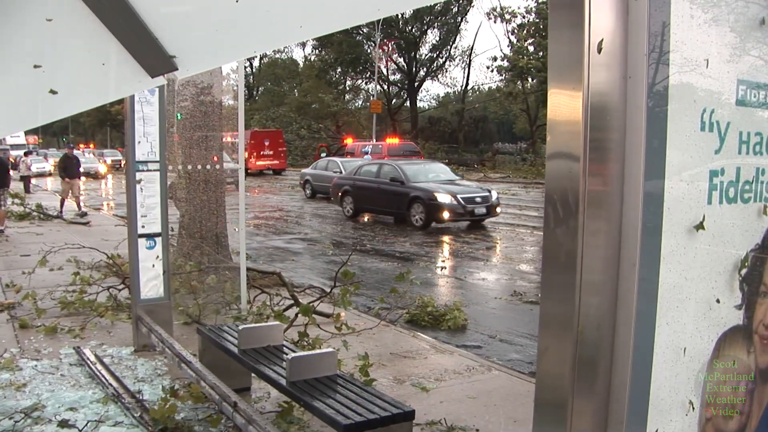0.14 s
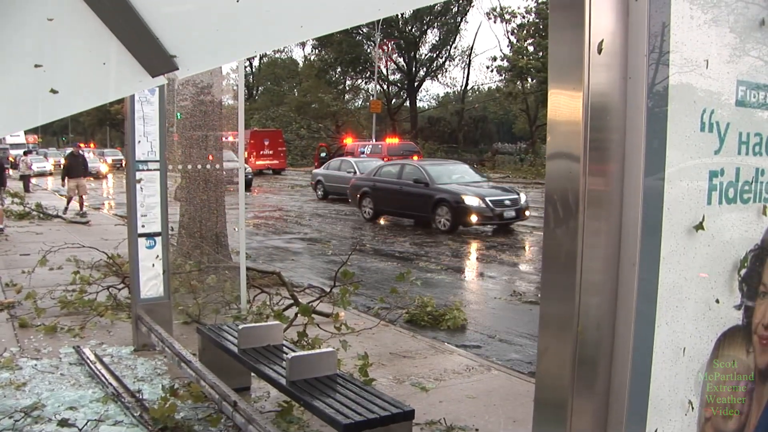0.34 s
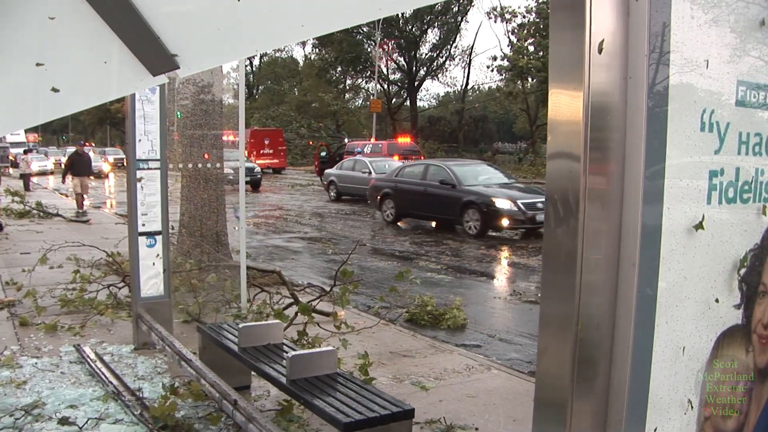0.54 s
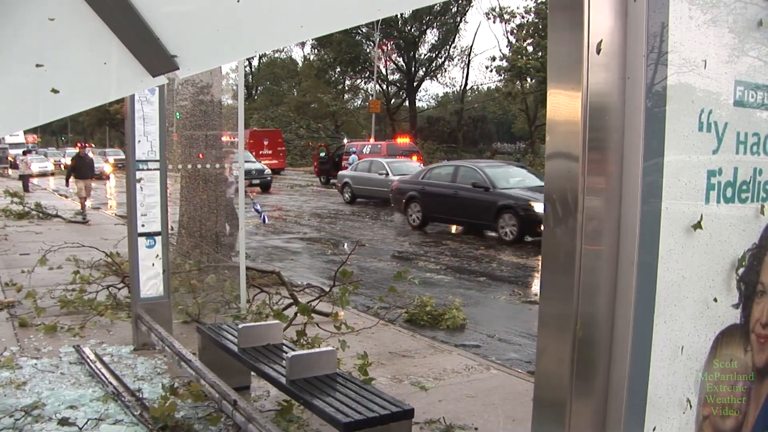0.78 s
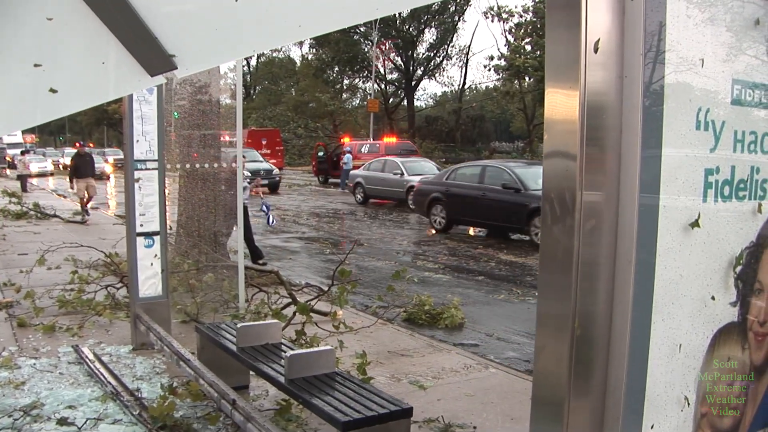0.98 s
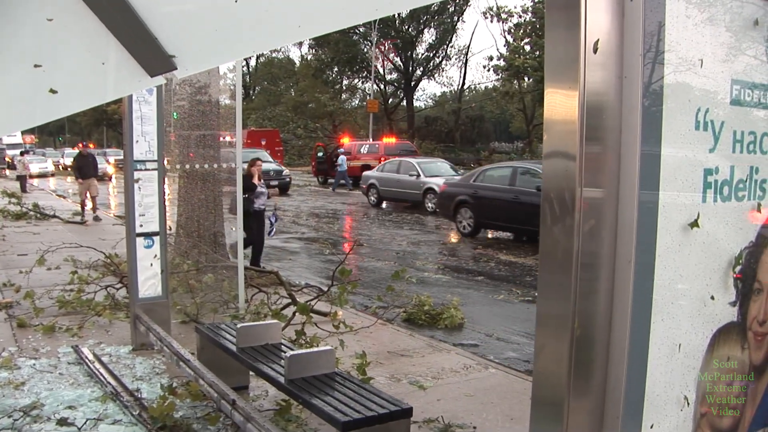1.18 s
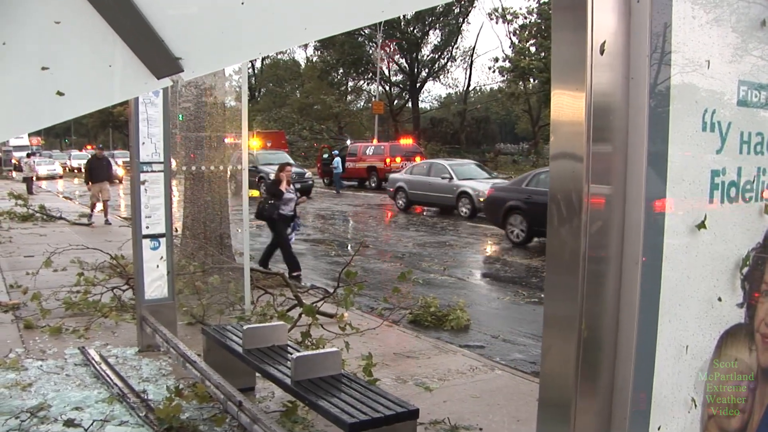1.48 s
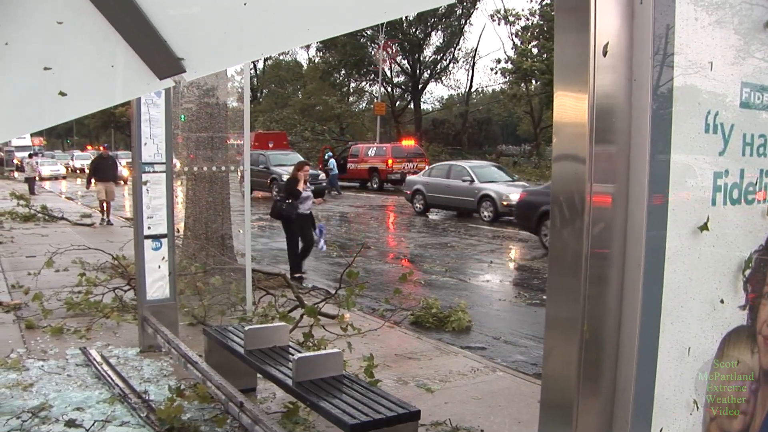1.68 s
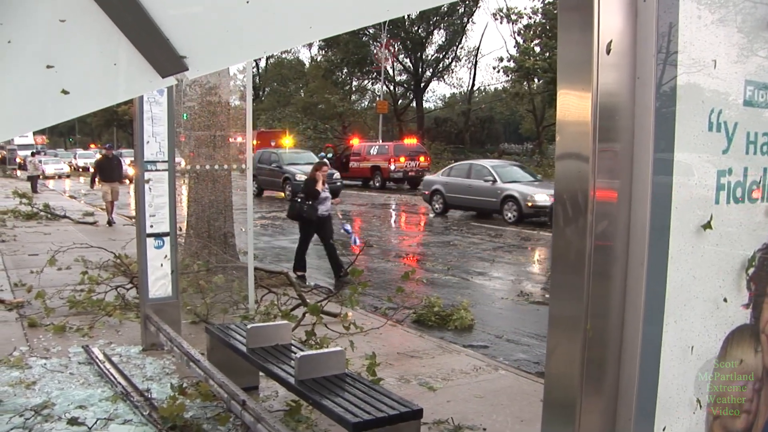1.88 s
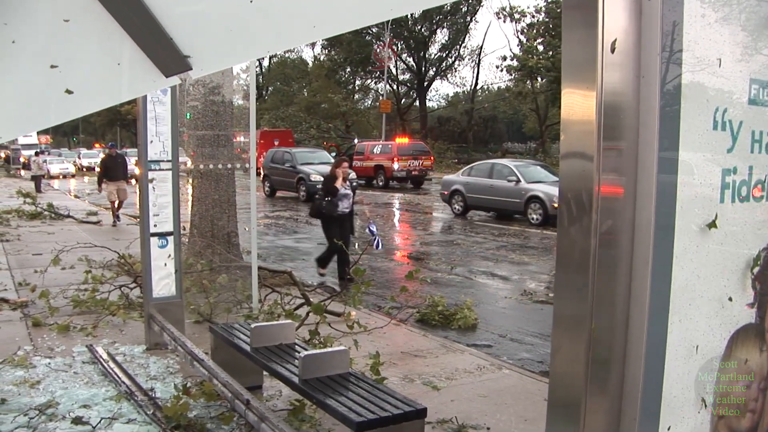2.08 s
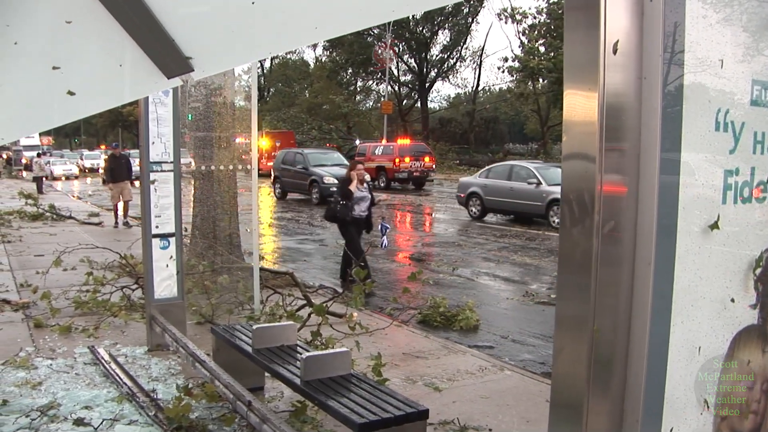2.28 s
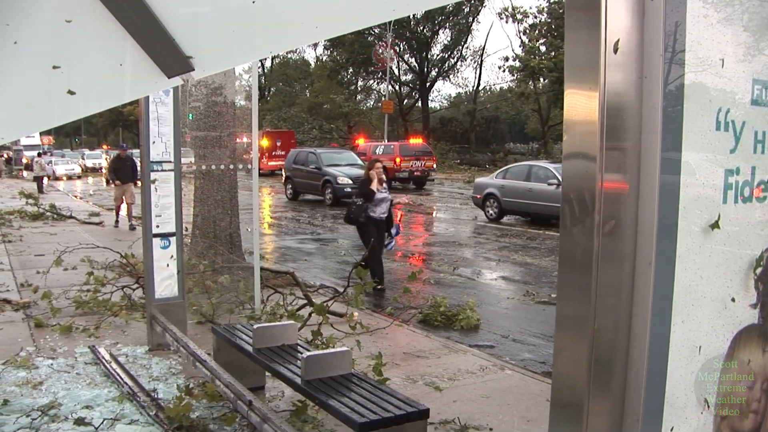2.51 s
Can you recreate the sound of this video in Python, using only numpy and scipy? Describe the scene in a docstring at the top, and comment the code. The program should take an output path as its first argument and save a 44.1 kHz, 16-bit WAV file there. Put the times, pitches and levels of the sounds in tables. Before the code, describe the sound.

Car tyres hiss and spatter on rain-soaked pavement as engines drone by and gradually fade

```python
"""Slow traffic on a wet street

A rain-soaked city street in stereo, from far to near. Far off lie low rumble, knocks and tyre noise, all
coloured noise or damped tones. Engines drone as sums of sines on a firing rate; one picks up at the end.
Faint whines are wavering sines and a brake squeals thin and high as a juddering one. Closest, the passing
car fades: its tyre hiss is flickering noise, its spray thousands of random clicks, with splashes on top.
"""
import sys
import numpy as np
from scipy import signal
from scipy.fft import rfft, irfft
from scipy.io import wavfile

SR = 44100
rng = np.random.default_rng(int(sys.argv[2]) if len(sys.argv) > 2 else 0)


def output_pcm(signal):
    """Save a mono or channel-first signal as 16-bit PCM at the path in sys.argv[1].

    Samples are clipped to [-1, 1] before scaling.
    """
    pcm = np.clip(np.atleast_2d(signal).T, -1, 1) * 32767
    wavfile.write(sys.argv[1], SR, np.round(pcm).astype(np.int16))


N = 116865
T = np.arange(N) / SR
HZ = np.maximum(np.fft.rfftfreq(N, 1 / SR), 1)

# Colours below are relative (dB per Hz): every noise is brought to rms 1 before its level is set.
# Stereo width of the noises: columns f/Hz, left-right likeness (-1 to 1)
STEREO_LIKENESS = [(60, .998), (110, .99), (200, .97), (340, .8), (500, .5), (680, .15), (1100, .23),
                   (1800, .6), (3100, .94), (3700, .68), (4450, -.45), (5000, .5), (5450, -.66),
                   (5900, -.72), (6250, -.9), (7000, -.93), (7700, -.85), (8400, -.5), (9250, -.55),
                   (10300, .74), (11600, .55), (12500, .12), (13700, .15), (14300, .58), (15000, .2)]
# Stereo balance of the noises: columns f/Hz, left over right/dB
STEREO_BALANCE = [(100, .1), (300, .6), (700, -2.2), (1500, -3.3), (2500, -.9), (4000, -.4), (5700, -2.7),
                  (6500, -.3), (7700, 0), (9050, -3.8), (9700, -.8), (11500, -4.5), (13500, -5.3),
                  (14500, -2.8)]
# Stereo phase of the noises: columns f/Hz, phase by which the left leads/rad
STEREO_LEAD = [(60, 0), (200, -.08), (450, -.4), (850, 0), (3100, -.02), (3900, -.45), (4400, 0),
               (4900, -.45), (5400, 0), (8300, 0), (9200, -.6), (9650, 0), (10000, .55), (10700, 0),
               (12000, -.4), (13000, 0)]
CUTOFF_HZ = 15080

# Rumble of the whole street, colour: columns f/Hz, density/dB
RUMBLE_COLOUR = [(20, -14), (38, -4.5), (58, 0.5), (100, -0.5), (135, -1), (200, -0.5), (260, -6.5),
                 (340, -12), (450, -19), (800, -77)]
# Rumble over time: columns t/s, level/dB
RUMBLE_LEVEL = [(0, -34.5), (.4, -34.5), (1.1, -34), (1.5, -34.5), (2.1, -33.5), (2.65, -36)]
# Passing swell in the low mids, colour: columns f/Hz, density/dB
SWELL_COLOUR = [(180, -15), (250, 1), (320, 16.5), (390, 3), (480, -29)]
# Swell over time: columns t/s, level/dB
SWELL_LEVEL = [(0, -68), (.7, -61), (1.0, -50), (1.45, -44.5), (1.9, -49.5), (2.65, -47)]
# Low knocks: columns t/s, envelope peak/dB
KNOCKS = [(1.874, -38), (2.006, -27), (2.054, -33), (2.477, -23)]
KNOCK_HZ, KNOCK_RISE_S = 123, 0.0049
# Far tyres, colour: columns f/Hz, density/dB
FAR_COLOUR = [(200, -8.5), (400, -0.5), (650, -0.5), (850, 1), (1100, 0.5), (1600, 0.5), (2500, -0.5),
              (3200, -6), (4300, -8), (6000, -28.5), (7300, -27.5), (9000, -29.5), (15000, -21.5)]
FAR_DB = -36.5
# Faint whines and drones of other vehicles: columns centre t/s, half length/s, f/Hz, waver/Hz, peak/dB
WHINE_TONES = [(2.23, .11, 1236, 6, -44), (1.33, .15, 1236, 7, -49), (.55, .2, 1236, 6, -51),
               (.5, .3, 2455, 25, -49), (.9, 1.0, 2072, 40, -53), (1.42, .07, 359, 5, -40),
               (1.62, .05, 381, 6, -47), (1.6, .5, 312, 3, -48), (.76, .07, 203, 3, -37),
               (.96, .09, 181, 2, -34), (1.62, .07, 224, 3, -40), (2.22, .11, 785, 14, -48)]

# Main engine slowing down: columns t/s, firing rate f/Hz, level/dB
MAIN_ENGINE = [(0, 92.4, -30), (.38, 92.2, -28), (.72, 92.8, -30), (.95, 90.4, -32.5), (1.25, 91, -32.5),
               (1.6, 88.1, -35.5), (1.88, 88.15, -34.5), (2.12, 84.53, -38), (2.65, 83.5, -40.5)]
# Its partials: columns multiple of the firing rate, relative level/dB
MAIN_ORDERS = [(1, 0), (1.501, -23), (2, -8.5), (2.25, -22)]
# Second engine easing off: columns t/s, firing rate f/Hz, level/dB
COASTING_ENGINE = [(0, 150.8, -47), (.35, 150.2, -33), (.65, 148, -45), (.85, 142, -39), (1.1, 137.7, -39),
                   (1.5, 130, -44), (2.05, 128.3, -35.5), (2.3, 120.7, -41.5), (2.65, 113.4, -42.5)]
# Its partials: columns multiple of the firing rate, relative level/dB
COASTING_ORDERS = [(1, 0.5), (1.5, -11), (2.75, -23)]
# Engine picking up: columns t/s, firing rate f/Hz, level/dB
PULLING_ENGINE = [(2.0, 128, -58), (2.23, 136, -45), (2.34, 156, -44), (2.45, 165, -31.5),
                  (2.56, 166, -30.5), (2.65, 168, -31.5)]
# Its partials: columns multiple of the firing rate, relative level/dB
PULLING_ORDERS = [(1, -1), (1.5, -19), (2, -20)]
ENGINE_LAG_S = .00007  # later on the left
ENGINE_ECHO_DB, ECHO_DECAY_S = -29, .05

# Brake squeal: columns t/s, level/dB
SQUEAL_LEVEL = [(.232, -62), (.245, -53), (.29, -53), (.355, -46), (.38, -55), (.4, -39.5), (.46, -43.5),
                (.48, -50), (.572, -51), (.6, -70)]
SQUEAL_HZ, SQUEAL_WAVER_HZ = 12795, 24
JUDDER_HZ, JUDDER_DEPTH = 56, 0.48
# Pitched rubbing of treads and brakes: columns centre t/s, half length/s, f/Hz, width/octaves, level/dB
RUBBING_BANDS = [(0.434, .13, 5770, .04, -58), (1.245, 0.13, 2090, 0.063, -41.5),
                 (1.249, 0.37, 1540, 0.091, -51.5), (1.382, .05, 3610, .008, -49),
                 (1.47, 0.14, 3170, 0.01, -48), (2.28, 0.13, 2450, .025, -44),
                 (2.3, 0.19, 2850, 0.056, -47), (2.25, .08, 1700, 0.022, -47)]
# White noise that the rubbing is cut from: columns f/Hz, density/dB
WHITE_COLOUR = [(100, 0), (15000, 0)]

# Single splashes: columns t/s, level/dB, left over right/dB, centre f/Hz, width/octaves
SPLASH_EVENTS = [(.166, -39, 0, 13000, .5), (.338, -35, 0, 11000, .35), (.787, -29, -1, 14500, .25),
                 (.83, -39, 0, 13000, .5), (.929, -33, 0, 13000, .8), (1.199, -42, 0, 12500, .5),
                 (1.507, -38, -1, 11500, .2), (1.683, -41, 0, 10300, .25), (2.265, -34.5, 5, 11000, .7)]
# Noise that the splashes are cut from: columns f/Hz, density/dB
SPLASH_COLOUR = [(2000, 0), (5800, 11), (7200, 5), (8500, -7), (15000, -4.5)]
SPLASH_ATTACK_S, SPLASH_DECAY_S = 0.00075, 0.0028
# Swish through a puddle, colour: columns f/Hz, density/dB
PUDDLE_COLOUR = [(2000, -27), (2900, 7), (3550, 1), (4300, -11), (6000, -41)]
PUDDLE_S, PUDDLE_HALF_S, PUDDLE_DB = 1.39, 0.029, -39.5
# Droplets thrown off the near tread, colour: columns f/Hz, density/dB
SPRAY_COLOUR = [(1000, 9.5), (3000, 12.5), (5800, 8.5), (7200, 0), (8500, 5.5), (11000, -1), (13500, 6),
                (15000, 1)]
# Spray over time: columns t/s, level/dB
SPRAY_LEVEL = [(0, -36.5), (.4, -42), (.65, -44), (1, -39.5), (1.35, -64), (2, -54), (2.65, -60)]
DROPS_PER_S, DROP_SPREAD_DB, CLUMP_DB = 6000, 4.2, 1.3
# Near tyres on the water film, colour: columns f/Hz, density/dB
HISS_COLOUR = [(300, -4), (700, -9.5), (1100, -8.5), (1500, -0.5), (2100, 1), (3100, 2), (3900, -2.5),
               (4600, -8.5), (4950, -6), (5300, -9), (5900, -3), (6600, -14), (7250, -27), (8500, -13),
               (10500, -14), (15000, -16.5)]
# Near tyres over time: columns t/s, level/dB
HISS_LEVEL = [(0, -35), (.35, -33.5), (.75, -35.5), (1.2, -36.5), (1.6, -37.5), (2.1, -39), (2.65, -40)]
FLICKER_DB = .5
PATCH_DB, PATCHES_PER_S, PATCH_LOW_HZ, PATCH_HIGH_HZ = .9, 14, 1000, 8000


def from_db(db):
    """Decibels to gain."""
    return 10 ** (np.asarray(db) / 20)


def rms_one(x):
    """Scale to unit power."""
    return x / np.sqrt(np.mean(x ** 2) + 1e-20)


def in_time(rows):
    """Each column of a curve, after its time column, at every sample."""
    s, *columns = np.transpose(rows)
    return [np.interp(T, s, column) for column in columns]


def gain_in_time(rows):
    """Gain at every sample from a level curve."""
    return from_db(in_time(rows)[0])


def at_hz(points):
    """A spectrum table at every frequency, joined along log frequency."""
    hz, value = np.transpose(points)
    return np.interp(np.log(HZ), np.log(hz), value)


def pan(db):
    """Left and right gains for a level difference; positive is louder on the left."""
    return from_db(np.array([[.5], [-.5]]) * db)


def drift(rate_hz):
    """Slow random wander of spread 1, weakening above the given rate."""
    return rms_one(irfft(rfft(rng.standard_normal(N)) / (1 + (HZ / rate_hz) ** 2), N))


def swell(s, half_s):
    """A smooth bell-shaped rise and fall around a moment."""
    return np.exp(-((T - s) / half_s) ** 2 / 2)


def around(x, hz, octaves):
    """Keep a bell-shaped band around a pitch."""
    bell = np.exp(-(np.log2(HZ / hz) / octaves) ** 2 / 2)
    return irfft(rfft(x) * bell, N)


def spread(two_signals, colour):
    """Colour two unrelated signals and mix them to the stereo likeness, phase and balance; rms 1."""
    a, b = rfft(two_signals)
    alike = at_hz(STEREO_LIKENESS)
    both = np.sqrt(1 + alike) * a + np.sqrt(1 - alike) * b * [[1], [-1]]
    turn = np.exp(1j * at_hz(STEREO_LEAD) * [[.5], [-.5]])
    gains = from_db(at_hz(colour)) * pan(at_hz(STEREO_BALANCE))
    return rms_one(irfft(both * turn * gains, N))


def wash(colour):
    """Smooth stereo noise of a given colour."""
    return spread(rng.standard_normal((2, N)), colour)


def rumble():
    """Low noise of the whole street, with a passing swell in the low mids."""
    steady = gain_in_time(RUMBLE_LEVEL) * wash(RUMBLE_COLOUR)
    passing = gain_in_time(SWELL_LEVEL) * wash(SWELL_COLOUR)
    return steady + passing


def knocks():
    """Soft low knocks in the rumble: a tone that rises quickly and dies within a few cycles."""
    out = np.zeros(N)
    for s, db in KNOCKS:
        age = np.maximum(T - s, 0)
        envelope = age / KNOCK_RISE_S * np.exp(1 - age / KNOCK_RISE_S)
        out += from_db(db) * envelope * np.sin(2 * np.pi * KNOCK_HZ * age)
    return out


def far_tyres():
    """Steady broad noise of far tyres."""
    return from_db(FAR_DB) * wash(FAR_COLOUR)


def whines():
    """Narrow, wavering tones of other vehicles that swell and fade."""
    out = np.zeros(N)
    for s, half_s, hz, waver_hz, db in WHINE_TONES:
        phase = 2 * np.pi * np.cumsum(hz + waver_hz * drift(33.3)) / SR
        out += from_db(db) * swell(s, half_s) * np.sin(phase)
    return out


def engine(curve, orders, wobble, flutter_db):
    """Exhaust partials on a slightly unsteady firing rate, each fluttering by itself."""
    hz, db = in_time(curve)
    phase = 2 * np.pi * np.cumsum(hz * (1 + wobble * drift(9.8))) / SR
    partials = np.zeros(N)
    for order, level_db in orders:
        gain = from_db(level_db + flutter_db * drift(12.0))
        start = 2 * np.pi * rng.random()
        partials += gain * np.sqrt(2) * np.sin(order * phase + start)
    return from_db(db) * partials


def echo(x):
    """Scattered reflections from the buildings: decaying noise, different on each side."""
    t = T[:SR // 3]
    tail = rng.standard_normal((2, len(t))) * np.exp(-t / ECHO_DECAY_S)
    tail = tail / np.sqrt(np.sum(tail ** 2, axis=1, keepdims=True))
    return signal.fftconvolve(x[None], tail, axes=1)[:, :N]


def engines_and_rumble():
    """Three near engines with echo over the rumble, all a little later on the left."""
    near = engine(MAIN_ENGINE, MAIN_ORDERS, wobble=0.0054, flutter_db=0.5)
    near += engine(COASTING_ENGINE, COASTING_ORDERS, wobble=0.0067, flutter_db=1.0)
    near += engine(PULLING_ENGINE, PULLING_ORDERS, wobble=.003, flutter_db=0.3)
    left, right = near + from_db(ENGINE_ECHO_DB) * echo(near) + rumble()
    return np.array([np.interp(T - ENGINE_LAG_S, T, left), right])


def brake():
    """One thin squeal of nearly steady pitch, right of centre, as the pad judders."""
    hz = SQUEAL_HZ + SQUEAL_WAVER_HZ * drift(60)
    tone = np.sqrt(2) * np.sin(2 * np.pi * np.cumsum(hz) / SR)
    judder = 1 + JUDDER_DEPTH * np.sin(2 * np.pi * JUDDER_HZ * T + drift(17))
    rubbing = (T > SQUEAL_LEVEL[0][0]) & (T < SQUEAL_LEVEL[-1][0])
    return pan(-5) * gain_in_time(SQUEAL_LEVEL) * rubbing * judder * tone


def rubbing_treads_and_pads():
    """Narrow bands of hiss that swell and fade as treads and brake pads rub."""
    white = wash(WHITE_COLOUR)
    out = np.zeros((2, N))
    for s, half_s, hz, octaves, db in RUBBING_BANDS:
        out += from_db(db) * swell(s, half_s) * rms_one(around(white, hz, octaves))
    return out


def splashes():
    """Short noise bursts that stand out of the spray, each with its own brightness."""
    out, fizz = np.zeros((2, N)), wash(SPLASH_COLOUR)
    for s, db, side_db, hz, octaves in SPLASH_EVENTS:
        burst = np.exp(-np.abs(T - s) / np.where(T < s, SPLASH_ATTACK_S, SPLASH_DECAY_S))
        out += from_db(db) * pan(side_db) * burst * rms_one(around(fizz, hz, octaves))
    return out


def puddle():
    """One short swish of noise through a puddle."""
    return from_db(PUDDLE_DB) * swell(PUDDLE_S, PUDDLE_HALF_S) * wash(PUDDLE_COLOUR)


def spray():
    """Thousands of tiny drop impacts of uneven size, their level swelling in clumps."""
    size_db = DROP_SPREAD_DB * np.minimum(rng.exponential(1, (2, N)), 4.5)
    sizes = from_db(size_db) * rng.choice([-1, 1], (2, N))
    drops = sizes * (rng.random((2, N)) < DROPS_PER_S / SR)
    clumps = from_db(CLUMP_DB * drift(25))
    return gain_in_time(SPRAY_LEVEL) * clumps * spread(drops, SPRAY_COLOUR)


def patchy(x):
    """Let every half octave in the patch range rise and fall by itself; rms 1."""
    step = 2 * np.log2(np.clip(HZ, PATCH_LOW_HZ, PATCH_HIGH_HZ) / PATCH_LOW_HZ)
    whole = rfft(x)
    out = np.zeros((2, N))
    for k in range(int(step.max()) + 2):
        band = irfft(whole * np.maximum(1 - np.abs(step - k), 0), N)  # overlapping triangles
        out += band * from_db(PATCH_DB * drift(PATCHES_PER_S))
    return rms_one(out)


def near_tyres():
    """Hiss of the nearest car's tyres, flickering in patches with the uneven water film."""
    flicker = from_db(FLICKER_DB * drift(23))
    return gain_in_time(HISS_LEVEL) * flicker * patchy(wash(HISS_COLOUR))


def scene():
    """The wet street, from the far rumble to the nearest car."""
    background = engines_and_rumble() + knocks() + far_tyres() + whines()
    rubbing = brake() + rubbing_treads_and_pads()
    water = splashes() + puddle() + spray() + near_tyres()
    return background + rubbing + water


def record(dry):
    """Cut the top steeply above the cutoff."""
    return irfft(rfft(dry) / np.sqrt(1 + (HZ / CUTOFF_HZ) ** 300), N)


dry = scene()
out = record(dry)
output_pcm(out)
```